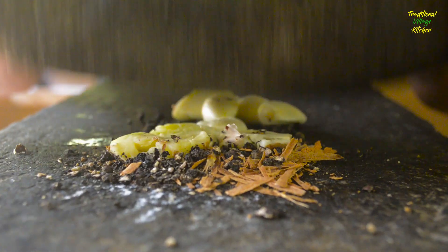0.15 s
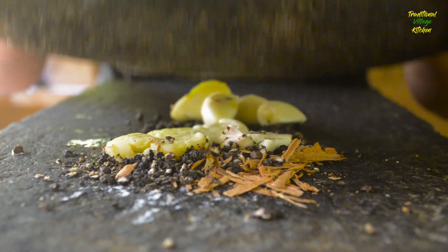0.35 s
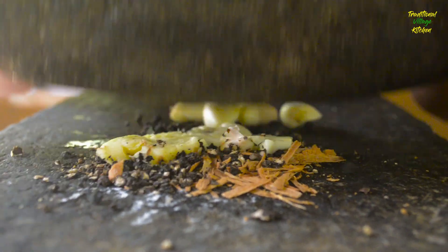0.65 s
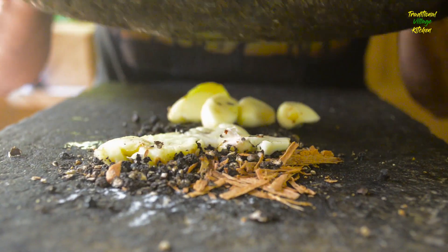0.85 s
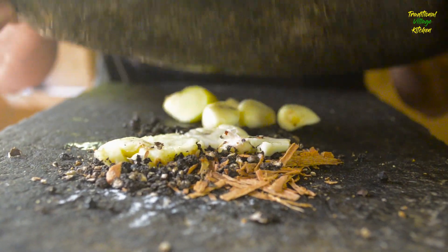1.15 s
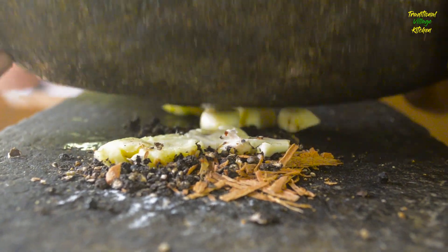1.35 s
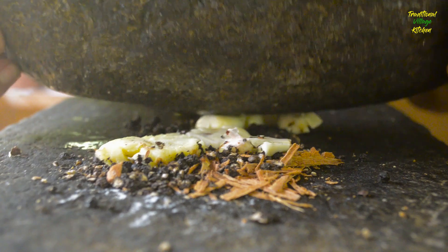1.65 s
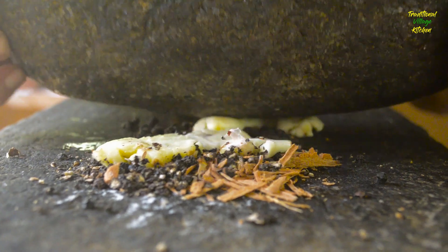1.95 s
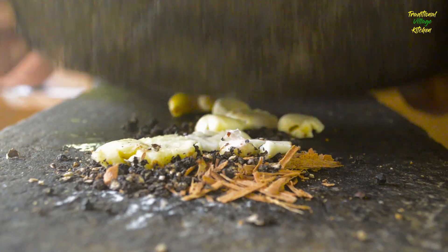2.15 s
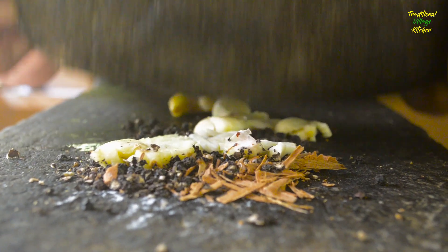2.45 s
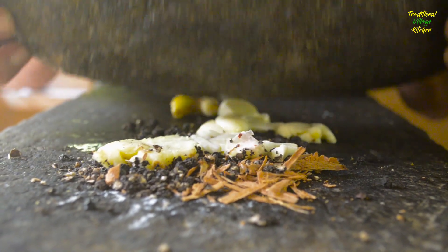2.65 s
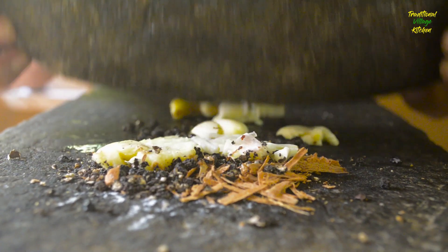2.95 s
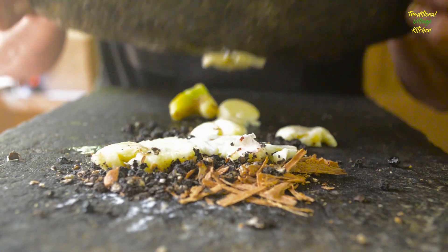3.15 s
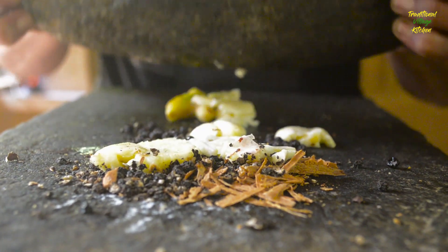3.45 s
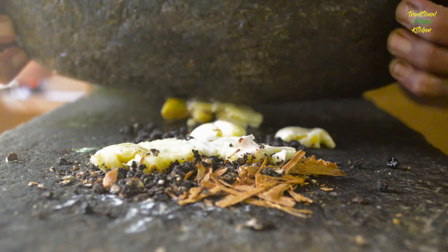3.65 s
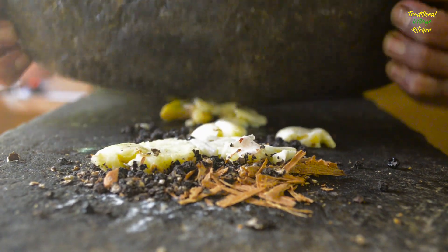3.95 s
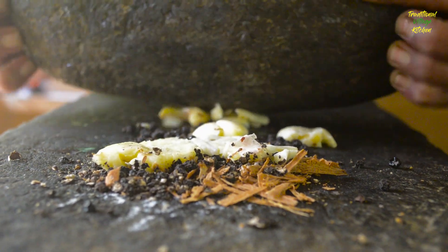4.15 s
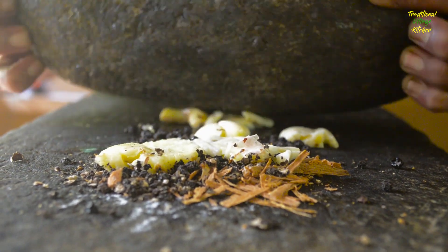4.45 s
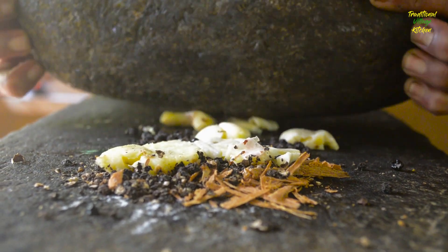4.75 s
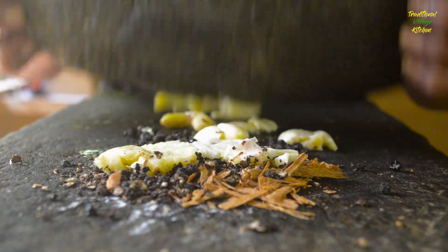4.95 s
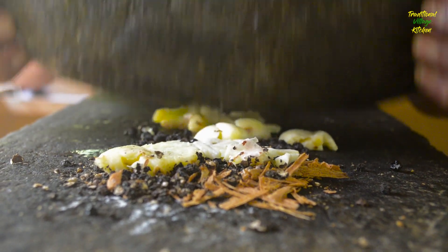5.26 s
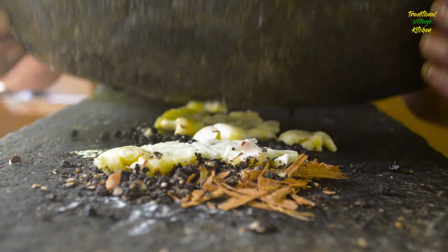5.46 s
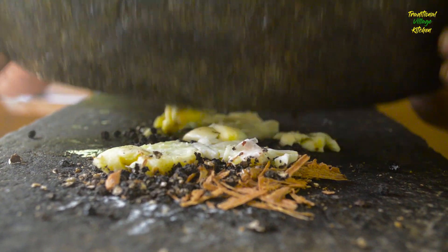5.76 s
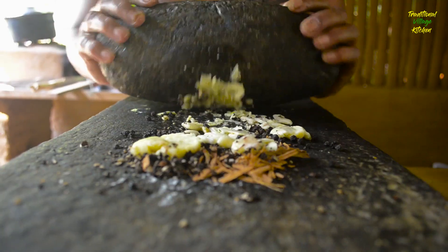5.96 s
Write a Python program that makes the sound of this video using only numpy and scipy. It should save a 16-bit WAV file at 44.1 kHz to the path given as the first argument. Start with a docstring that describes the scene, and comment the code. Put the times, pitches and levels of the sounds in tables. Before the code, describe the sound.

Close to the microphone, a heavy stone roller pounds garlic and whole spices on a stone slab in an open kitchen. Under it lies a faint, steady, low-weighted room noise with barely audible distant sounds. Blows land at about 0.25, 0.58, 1.03, 1.36 and 1.67 seconds, then every 0.3 seconds or so, with a longer gap between 2.83 and 3.29. Each is a short, dull, hollow knock with a low floor thump, a crisp seed click and a quick gritty crunch thinning into a soft squash. Those near 0.58, 2.54, 2.83, 4.76 and 5.05 have harder stone-on-stone contact; around 1.03 it is duller. A tiny clink follows at 1.27. Pounding continues to 5.65, with a small dry tick at 5.79. At 5.86 the sound cuts abruptly, and very faint touches at 5.95 to 6.08 start to fade in. Reflections are short and sparse.

```python
"""Stone roller on garlic and spices

A heavy stone roller is dropped again and again on garlic and whole spices on a slab, close to the microphone.
Smooth force pulses ring low slab and floor modes; seeds snap as short resonant clicks; spice crushes as
bursts of noise grains. Sparse reflections, steady noise, narrow bands and small knocks make an open kitchen.
Near the end an edit cuts the sound and the next blows fade in."""
import sys
import numpy as np
from scipy import signal
from scipy.fft import rfft, irfft
from scipy.io import wavfile
from scipy.ndimage import uniform_filter1d

SR = 44100
rng = np.random.default_rng(int(sys.argv[2]) if len(sys.argv) > 2 else 0)


def dump(signal):
    """Clip the signal to [-1, 1] and save it as 16-bit WAV at the path in sys.argv[1]."""
    limited = np.clip(np.atleast_2d(signal).T, -1, 1)
    pcm = np.round(limited * 32767).astype(np.int16)
    wavfile.write(sys.argv[1], SR, pcm)


def volts_from_db(level):
    """Convert decibel levels to linear amplitude ratios."""
    exponent = np.asarray(level, float) / 20
    return 10 ** exponent


N = 269010
LEAD = SR // 4  # samples computed ahead of the start, then dropped
CUT_S = 5.862

# steady kitchen wash, spectrum: freq_hz, relative_db
WASH_SPECTRUM = [(40, -7.5), (62, -6), (85, -3), (120, -6), (200, -8), (400, -11.5), (660, -11),
                 (1000, -12), (1900, -17), (2900, -22.5), (4200, -32), (5500, -36), (8000, -39),
                 (11500, -41.5), (13400, -51), (16000, -66)]
# faint distant bands: start_s, end_s, centre_hz, width_hz, level_db
FAR_BANDS = [(-.14, .27, 7850, 450, -73), (-.15, .32, 685, 70, -66), (.22, .62, 630, 90, -68),
             (.68, .97, 530, 80, -70), (2.6, 3.25, 1300, 90, -75), (3.07, 3.23, 1980, 110, -73),
             (2.97, 3.11, 2230, 100, -76)]
# ringing knocks, a far clink, a dry tick: start_s, pitch_hz, level_db, rise_s, t60_s
CLINKS = [(1.265, 1420, -47, 0.012, .06), (1.265, 3250, -58.5, 0.0016, 0.051),
          (5.7924, 2000, -32, 0.0018, 0.0077), (5.7937, 1066, -41, 0.0044, 0.016)]
# kitchen decay: freq_hz, t60_s
KITCHEN_DECAY = [(100, 0.39), (300, 0.3), (2000, 0.19), (10000, 0.19)]
# seeds snapping one by one: time_s, peak_db, centre_hz
SEED_SNAPS = [(0.2497, -20, 3300), (0.5755, -19, 3140), (0.5795, -14.5, 3120), (1.024, -39, 1310),
              (1.0316, -25.5, 1180), (1.0354, -21, 1580), (1.0418, -25.5, 1960), (1.3542, -36, 1120),
              (1.3602, -14, 1780), (1.364, -21.5, 2450), (1.665, -37, 1500), (1.675, -20, 2207),
              (1.6771, -14, 1990), (1.963, -12.5, 1900), (1.9657, -13, 3320), (2.2474, -13.5, 2240),
              (2.544, -23.5, 3230), (2.545, -29, 3100), (2.8296, -17, 3070), (2.8325, -15, 2970),
              (3.2872, -27.5, 2480), (3.2916, -34.5, 2400), (3.6162, -27, 2370), (3.9134, -10.5, 2610),
              (3.9193, -18, 2230), (4.2043, -18.5, 2500), (4.2146, -29, 2420), (4.4848, -14.5, 2830),
              (4.4916, -23, 2900), (4.766, -13, 2600), (4.769, -16, 2400), (5.0473, -14, 3150),
              (5.0509, -18, 2430), (5.058, -30.5, 2360), (5.3455, -16, 2760), (5.643, -34.5, 1640),
              (5.6433, -28, 2690), (5.6477, -28, 2430), (5.661, -37, 2500), (5.719, -56, 4500),
              (5.73, -55, 4000), (5.794, -34.5, 1810)]
# spice under the roller: peak_s, burst_db, treble_db (relative to body), squash_db, centre_hz
SPICE_CRUSHES = [(0.25, -32.5, -15, -47.5, 2570), (0.577, -33.5, -15, -44.5, 2520),
                 (1.034, -39, -21.5, -50.5, 1820), (1.363, -37.5, -15, -50.5, 2330),
                 (1.674, -29.5, -16.5, -43.5, 2650), (1.96, -37, -19.5, -41, 2420),
                 (2.245, -29.5, -14.5, -45.5, 2050), (2.544, -32, -10.5, -53, 2700),
                 (2.831, -34, -9, -48.5, 2360), (3.284, -35.5, -14.5, -54, 2120),
                 (3.613, -35, -13, -50.5, 2320), (3.915, -37.5, -5, -48, 2230),
                 (4.206, -32, -13, -50.5, 2560), (4.484, -26, -13.5, -49, 3360),
                 (4.767, -30, -9.5, -52, 2620), (5.051, -27.5, -14, -48.5, 2580),
                 (5.345, -37, -10, -54.5, 2640), (5.643, -38.5, -12.5, -52.5, 2205),
                 (5.911, -48, -21, -62, 2550), (6.045, -69, -7.5, -62, 2500),
                 (6.072, -67, -13.5, -58, 2470)]
# crushing body, spectrum: freq_hz, relative_db
GRIT_SPECTRUM = [(410, -44), (700, -1), (1410, 4.5), (1650, 1.5), (1800, -0.5), (2450, -2.5), (2700, 2),
                 (7000, -19), (9100, -44), (15400, -120)]
# crushing treble, spectrum: freq_hz, relative_db
SIZZLE_SPECTRUM = [(3000, -35.5), (4500, -2.5), (6500, -4), (9000, -6.5), (13500, -8), (16000, -22)]
# slab and floor modes: freq_hz, level_db, t60_s, first_swing (1 towards the microphone, -1 away)
SLAB_MODES = [(55.97, -41.5, 0.57, -1.0), (62.77, -31, 0.34, -1.0), (63.64, -40, 0.89, -1),
              (97.3, -30, 0.17, -1.0), (101.17, -28, 0.26, 1.0), (123.3, -33.5, 0.29, 1.0),
              (137, -13.5, 0.037, 1.0), (147.8, -37.5, 0.39, -1.0), (187.9, -18.5, 0.1, -1.0),
              (225.6, -30.5, 0.24, -1.0), (262.3, -30.5, 0.13, 1.0), (295.5, -11.5, 0.063, 1.0),
              (296.9, -15.5, 0.11, -1.0), (346.7, -27.5, 0.095, -1.0), (394.8, -15.5, 0.083, 1.0),
              (415.7, -29, 0.175, 1.0), (444, -10, 0.063, 1.0), (442.4, -0.82, 0.021, -1.0),
              (524, -10.5, 0.025, 1.0), (583, -33, 0.13, -1.0), (626.8, -27, 0.21, 1.0),
              (670, -22.5, 0.093, -1.0), (682, -26.5, 0.1, 1)]
# blows and bounces: push_centre_s, push_db (through garlic), push_ms, stone_db (stone on stone),
# stone_after_ms (after the push centre)
ROLLER_BLOWS = [(-0.054, -8, 11, -34, -5), (0.2502, 2.5, 8, -6.5, -4), (0.5790, -14, 4.7, 4, -3),
                (1.0355, 1, 18, -18.5, -6), (1.3586, -2, 11, -12.5, 6.5), (1.6730, -0.5, 10.4, -17, 2.5),
                (1.9656, 3.2, 14.3, -18, -7.5), (2.2450, 1.5, 10, -7, 2.5), (2.2640, -10.5, 4.8, -40, 1.5),
                (2.5400, -7.5, 8.6, 3.5, 1.5), (2.8282, 1.2, 11.7, 2.04, 1.6), (3.2911, -5, 12, -12.5, -5),
                (3.6140, -1.5, 15, -9.5, -3.5), (3.9135, 0.5, 11, -10.5, -3.5), (4.2045, 2, 7, -3.5, -3.5),
                (4.4826, 4.5, 12, -8, -1.1), (4.7632, 0, 4.3, 1.5, 2.5), (5.0483, -12, 15, 5, -1),
                (5.3600, 0, 15, -9, -12), (5.6580, 5.5, 14.8, -11, -9), (5.948, -13.5, 4.1, -31.5, 1),
                (6.051, -27, 4.9, -35, 6), (6.077, -34, 3, -51, -4)]
# level after the cut: time_s, gain_db
NEXT_FADE = [(5.858, -22), (5.95, -35.5), (6.03, -20), (6.1, -7)]


def read(points, hz):
    """Interpolates a table on a log-frequency axis."""
    f, value = np.transpose(points)
    return np.interp(np.log(hz + 1), np.log(f + 1), value)


def evened(x):
    """Scales to rms 1."""
    return x / np.sqrt(np.mean(x ** 2) + 1e-20)


def coloured(x, points):
    """Filters by a spectrum in dB, then scales to rms 1."""
    gain = volts_from_db(read(points, np.fft.rfftfreq(len(x), 1 / SR)))
    return evened(irfft(rfft(x) * gain, len(x)))


def add(mix, start_s, sound):
    """Mixes a sound in at start_s."""
    part = mix[round(start_s * SR) + LEAD:][:len(sound)]
    part += sound[:len(part)]


def resonate(x, hz, width_hz):
    """One-pole complex resonance, gain about 1 at its centre."""
    r = np.exp(-np.pi * width_hz / SR)
    return 2 * signal.lfilter([1 - r], [1, -r * np.exp(2j * np.pi * hz / SR)], x).real


def resonate_twice(x, hz, width_hz):
    """Two equal resonances in series: steeper skirts."""
    return resonate(resonate(x, hz, width_hz), hz, width_hz)


def kitchen_wash():
    """Steady noise of the open kitchen, its spectrum drifting in patches of 1 dB rms."""
    frames, hz = (N + LEAD) // 256 + 5, np.fft.rfftfreq(1024, 1 / SR)
    real, imag, patches = rng.standard_normal((frames, 513, 3)).T
    patches = uniform_filter1d(patches, 10, 0)  # over bins
    patches_db = evened(uniform_filter1d(patches, 20, 1))  # over frames
    z = (real + 1j * imag) * volts_from_db(read(WASH_SPECTRUM, hz)[:, None] + patches_db)
    wash = signal.istft(z, nperseg=1024, noverlap=768)[1][:N + LEAD]
    return volts_from_db(-60.5) * evened(wash)


def far_bands():
    """Distant sound: narrow bands of noise that swell and fade."""
    out = np.zeros(N + LEAD)
    for start_s, end_s, hz, width_hz, db in FAR_BANDS:
        band = evened(resonate_twice(rng.standard_normal(SR), hz, width_hz))
        band = band[:round((end_s - start_s) * SR)]
        add(out, start_s, volts_from_db(db) * band * signal.windows.tukey(len(band), 0.7))
    return out


def clinks():
    """Small knocks: sines with a linear rise and exponential decay."""
    out, t = np.zeros(N + LEAD), np.arange(SR // 5) / SR
    for start_s, hz, db, rise_s, t60_s in CLINKS:
        decay = volts_from_db(db - 60 * np.maximum(t - rise_s, 0) / t60_s)
        add(out, start_s, np.minimum(t / rise_s, 1) * decay * np.sin(2 * np.pi * hz * t))
    return out


def kitchen_reflections(x):
    """Sparse reflections of random sign, each band dying at its own speed."""
    taps = np.zeros(SR // 2)
    at = np.arange(250, len(taps) - 20, 20)
    taps[at + rng.integers(0, 20, len(at))] = rng.choice([-1., 1.], len(at))
    hz, t, z = signal.stft(taps, SR, nperseg=256)
    decay = volts_from_db(-60 * t / read(KITCHEN_DECAY, hz)[:, None])
    tail = signal.istft(z * decay, SR, nperseg=256)[1]
    return signal.oaconvolve(x, tail / np.linalg.norm(tail))[:len(x)]


def snaps(rows):
    """A breaking seed clicks: a few cycles near its centre, with a rough edge and a bright spit."""
    out, t = np.zeros(N + LEAD), np.arange(400) / SR
    small = signal.butter(2, 800, "high", fs=SR, output="sos")  # a seed is too small to push bass
    bright = signal.butter(2, [3600, 11000], "band", fs=SR, output="sos")
    for time_s, peak_db, hz in rows:
        edge, spit = rng.standard_normal((2, 400))
        drive = 0.21 * edge * np.exp(-t / 0.0011)
        drive[0] = 1
        body = resonate(drive, hz * 0.66, 0.71 * hz)
        body -= 1.11 * resonate(drive, hz * 1.44, 0.67 * hz)
        body += 0.33 * resonate(drive, hz * 2.16, 0.52 * hz)
        body = signal.sosfilt(small, body)
        body = signal.sosfilt(signal.butter(2, 3.9 * hz, fs=SR, output="sos"), body)
        spit = signal.sosfilt(bright, spit * np.exp(-t / 0.00075))
        spit_db = -21.5 + 9.5 * np.log2(hz / 2500)  # grows with pitch, per octave
        snap = body / np.linalg.norm(body) + volts_from_db(spit_db) * spit / np.linalg.norm(spit)
        add(out, time_s - 0.0002, volts_from_db(peak_db) * snap / abs(snap).max())
    return out


def crush(rows):
    """Uneven grains build as the roller bites, burst, then thin out as paste gives; also returns slab shake."""
    bite_t60_s, burst_t60_s, squash_t60_s = 0.016, 0.033, 0.22
    touch_s, touch_db = 0.010, -12  # roller meets the heap: time before the burst, level re squash
    grains_per_s = 6000
    shape = (3, N + LEAD)
    size_db = 4.5 * np.minimum(rng.exponential(1, shape), 3)
    size = volts_from_db(size_db) * rng.standard_normal(shape)
    grains = size * (rng.random(shape) < grains_per_s / SR)
    grit, sizzle = coloured(grains[0], GRIT_SPECTRUM), coloured(grains[1], SIZZLE_SPECTRUM)
    sound, bursts = np.zeros(N + LEAD), np.zeros(N + LEAD)
    t = np.arange(-SR // 25, SR // 4) / SR
    late = np.clip(1 + t / 0.0086, 0, 1)  # treble comes only once shells break
    for peak_s, burst_db, treble_db, squash_db, hz in rows:
        start_s = peak_s + t[0]
        burst = volts_from_db(burst_db - 60 * np.maximum(t / burst_t60_s, -t / bite_t60_s))
        squash_fall = np.maximum(abs(t / squash_t60_s) ** 1.06, -t / 0.014)
        touch = np.clip((t + touch_s) / 0.00085, 0, 1) * (t < 0)
        level = burst + volts_from_db(squash_db - 60 * squash_fall) + volts_from_db(squash_db + touch_db) * touch
        at = round(start_s * SR) + LEAD
        level = level[:N + LEAD - at]
        body = grit[at:][:len(level)]
        body = evened(body + 0.85 * resonate_twice(body, hz, 0.35 * hz))
        treble = late[:len(level)] * volts_from_db(treble_db) * sizzle[at:][:len(level)]
        add(sound, start_s, level * (body + treble))
        add(bursts, start_s, burst)
    return sound, volts_from_db(-12.5) * bursts * evened(grains[2])


def thumps(rows, shake):
    """Force pulses and spice shake ring the slab; a long contact leaves only the low modes."""
    force, t = shake.copy(), np.arange(SR) / SR
    for centre_s, push_db, push_ms, stone_db, stone_after_ms in rows:
        stone_ms = np.clip(2.48 + 0.16 * (4 - stone_db), 1, 8)  # weaker touches last longer
        contacts = [(0, push_db, push_ms), (stone_after_ms, stone_db, stone_ms)]
        for lag_ms, db, ms in contacts:
            pulse = np.hanning(max(round(ms * SR / 1000), 3))
            add(force, centre_s + (lag_ms - ms / 2) / 1000, volts_from_db(db) * pulse / pulse.sum())
    ring = np.zeros(SR)
    for hz, db, t60_s, first_swing in SLAB_MODES:
        ring += np.sign(first_swing) * volts_from_db(db - 60 * t / t60_s) * np.sin(2 * np.pi * hz * t)
    return signal.oaconvolve(force, ring)[:N + LEAD]


def blows(keep):
    """Blows at the kept times with kitchen reflections; thumps feed them only above 160 Hz, so bass stays dry."""
    pushes = [row for row in ROLLER_BLOWS if keep(row[0])]
    spice, shake = crush([row for row in SPICE_CRUSHES if keep(row[0])])
    bright = snaps([row for row in SEED_SNAPS if keep(row[0])]) + spice
    low = thumps(pushes, shake)
    knock = signal.sosfilt(signal.butter(2, 160, "high", fs=SR, output="sos"), low)
    return low + bright + kitchen_reflections(volts_from_db(-15.5) * bright + volts_from_db(-13.0) * knock)


def scene():
    """Blows before the cut stop there; the later ones fade in over the same wash."""
    t = (np.arange(N + LEAD) - LEAD) / SR
    wash = kitchen_wash()
    first = blows(lambda s: s < CUT_S) + wash + far_bands() + clinks()
    second = blows(lambda s: s > CUT_S) + wash
    gate = np.clip((CUT_S - t) / 0.0022, 0, 1)
    fade = volts_from_db(np.interp(t, *np.transpose(NEXT_FADE)))  # scales blows and wash alike
    return (gate * first + (1 - gate) * fade * second)[None, LEAD:]


def low_pass(x):
    """Removes everything above the highest recorded frequency."""
    return signal.sosfilt(signal.butter(12, 16510, fs=SR, output="sos"), x)


def record(dry):
    """The microphone rolls off below 40 Hz; a lowpass ends the band near 16.4 kHz."""
    x = signal.sosfilt(signal.butter(4, 40, "high", fs=SR, output="sos"), dry)
    x = signal.oaconvolve(x, signal.firwin(255, 16400, fs=SR)[None], "same")
    return low_pass(x)


dry = scene()
out = record(dry)
dump(out)
```